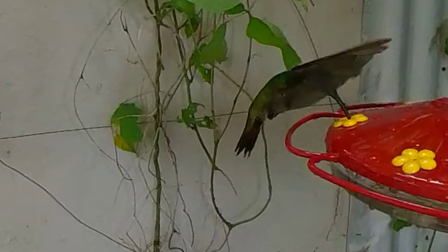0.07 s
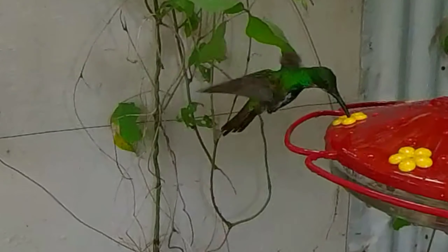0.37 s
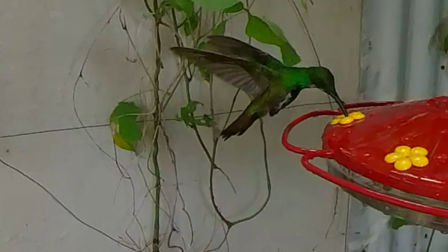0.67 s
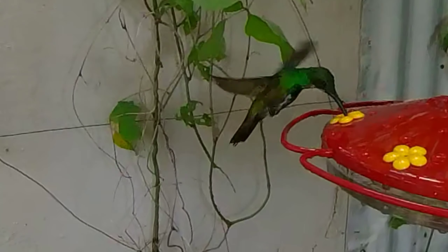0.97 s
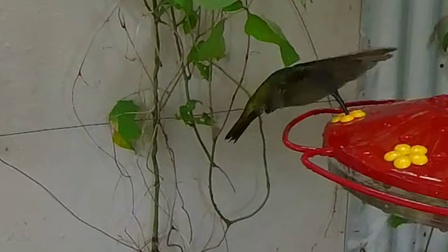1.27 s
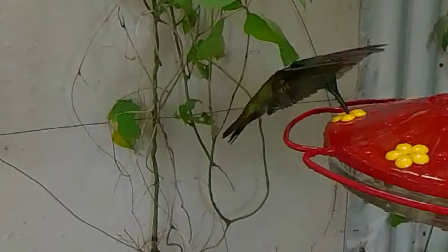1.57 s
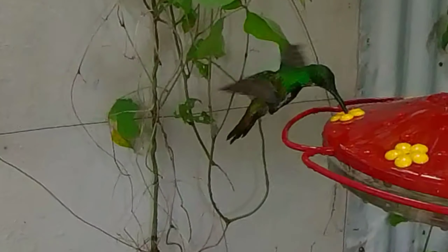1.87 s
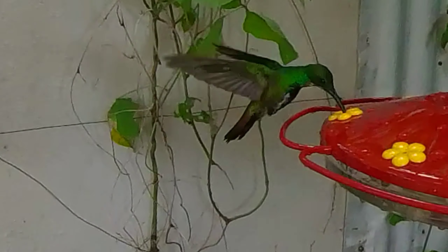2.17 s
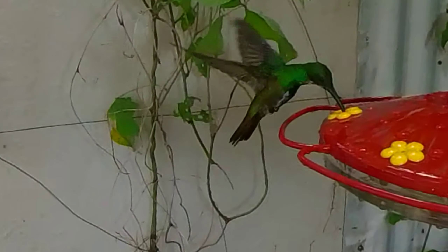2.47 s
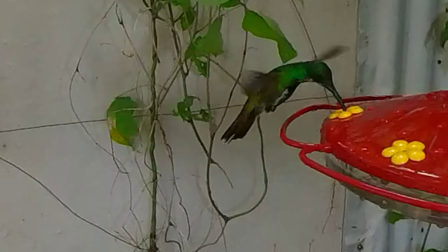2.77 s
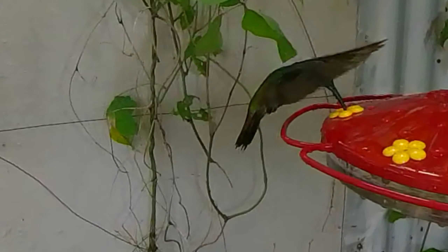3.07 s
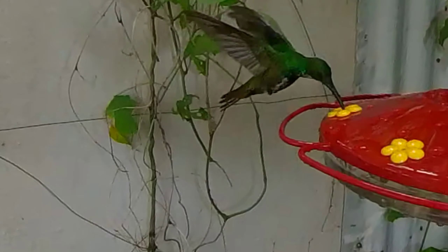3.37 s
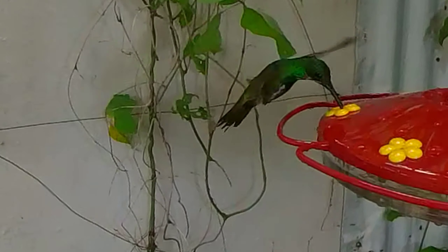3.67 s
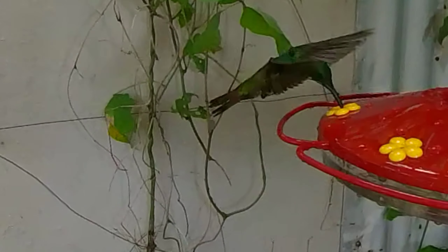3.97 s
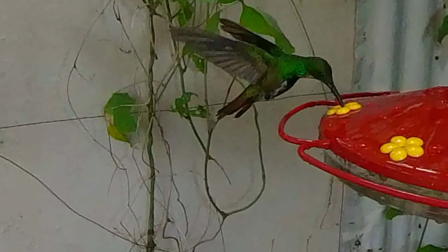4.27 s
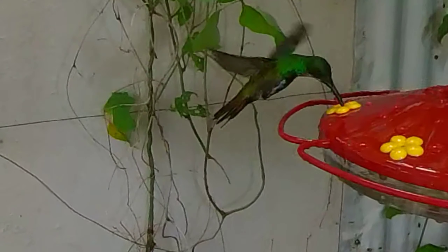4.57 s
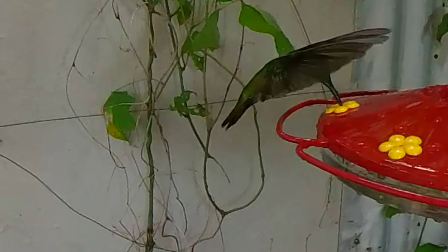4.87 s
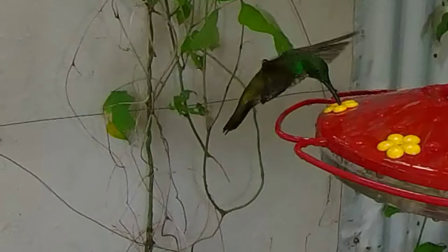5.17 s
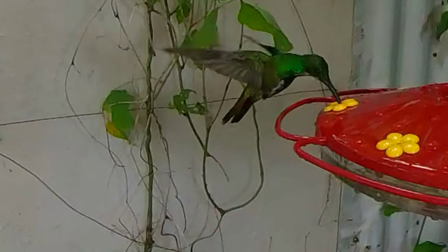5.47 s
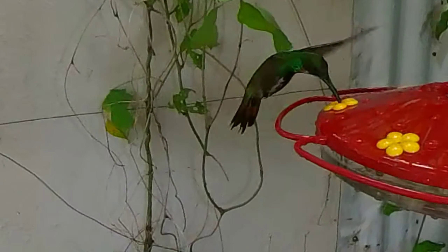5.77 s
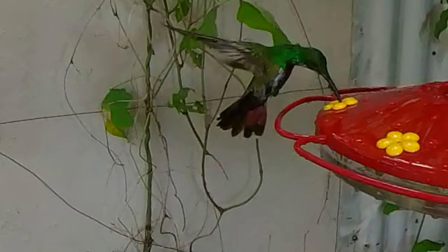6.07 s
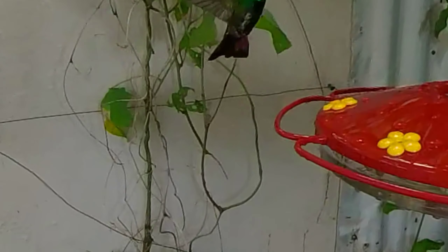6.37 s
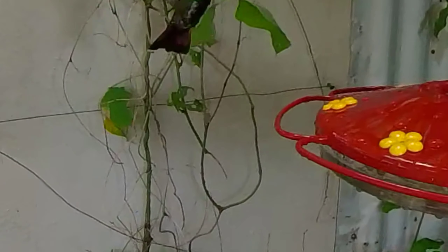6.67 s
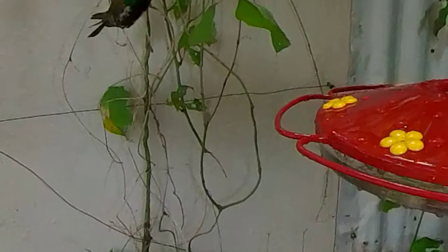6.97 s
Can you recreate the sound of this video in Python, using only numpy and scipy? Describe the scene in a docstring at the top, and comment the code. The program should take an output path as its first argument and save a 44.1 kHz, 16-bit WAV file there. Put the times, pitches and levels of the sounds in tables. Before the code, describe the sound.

A hummingbird's wings hum at a feeder over a low outdoor rumble, with scattered bird chips and then high, whistled chittering.

```python
"""A hummingbird hovers at a feeder by a house wall, its wing strokes humming over a low outdoor rumble,
a far engine, faint peeps and a thin hiss like that of compressed audio. Single V-shaped chips soon come
from farther off. From 4.4 s come two runs of high, whistled chittering, and a lower-voiced bird slurs
once in each; the walls throw the calls back. Near the end feathers snap twice as the bird flies up,
and the hum is loudest as it comes close."""
import sys
import numpy as np
from scipy import signal
from scipy.fft import rfft, irfft, next_fast_len
from scipy.io import wavfile
from scipy.ndimage import uniform_filter1d

SR = 44100
rng = np.random.default_rng(int(sys.argv[2]) if len(sys.argv) > 2 else 0)


def dump(signal):
    """Clip the signal to [-1, 1] and save it as 16-bit WAV at the path in sys.argv[1]."""
    limited = np.clip(np.atleast_2d(signal).T, -1, 1)
    pcm = np.round(limited * 32767).astype(np.int16)
    wavfile.write(sys.argv[1], SR, pcm)


N = 309141
TIME = np.arange(N) / SR

# Wingbeat. Each row: time in seconds, stroke rate in Hz.
STROKE_RATE = [(0.0, 48.4), (0.29, 55.9), (0.41, 52.24), (1.0, 55.45), (1.17, 45.7), (1.4, 46.76),
               (1.81, 52.63), (3.22, 54.77), (3.32, 52.28), (4.12, 50.24), (5.5, 55.6), (7.01, 50.6)]
# Hum partials. Each row: multiple of the stroke rate, relative level in dB.
WING_PARTIALS = [(.5, -19.5), (1, 1), (1.5, -19.5), (2, -14), (3, -26.5), (4, -30), (5, -27)]
# Hum envelope. Each row: time in seconds, relative level in dB.
WING_LEVEL = [(0.0, -38), (0.06, -44.5), (0.19, -72), (0.29, -54), (0.41, -51.5), (0.68, -43), (0.84, -55),
              (0.88, -50), (1.6, -51), (1.79, -68), (1.83, -47), (2.15, -41), (2.52, -63), (2.85, -48),
              (2.91, -51), (2.95, -52), (3.24, -39.5), (3.26, -53), (3.53, -46), (3.57, -37), (3.63, -60),
              (3.69, -40), (3.9, -49), (4.65, -42), (4.71, -38), (5.06, -48.5), (5.09, -66), (5.19, -41),
              (5.33, -41), (5.39, -57), (5.46, -38.5), (5.58, -54), (5.64, -41.5), (5.82, -60),
              (5.88, -37.5), (6.09, -50), (6.21, -35.5), (6.29, -46.5), (6.35, -34.5), (6.44, -51),
              (6.66, -35.5), (6.83, -40), (6.93, -29), (7.01, -38)]


def wings(gain_db=-2, flutter_db=2, flutter_hz=7, wander_hz=1.502):
    """Up- and downstroke each push the air once; their slight inequality gives half multiples."""
    stroke_hz = curve(STROKE_RATE) + wander_hz * drift(6, N)
    phase = 2 * np.pi * np.cumsum(stroke_hz) / SR
    hum = sum(from_db(db) * np.sin(k * phase + rng.uniform(0, 2 * np.pi)) for k, db in WING_PARTIALS)
    level_db = curve(WING_LEVEL) + flutter_db * np.minimum(drift(flutter_hz, N), 1)
    return np.sqrt(2) * from_db(level_db + gain_db) * hum


def whistle(shape, ratio=1, octave_db=-40, jitter=.012, uneven_db=2, edge_s=.0015):
    """One syrinx note: an unsteady gliding sine with its octave. Jitter is a fraction of the pitch."""
    s, hz, db = np.transpose(shape)
    t = np.arange(0, s[-1], 1 / SR)
    glide_hz = uniform_filter1d(np.interp(t, s, hz), size=88, mode="nearest")
    pitch_hz = glide_hz * ratio * (1 + jitter * drift(500, len(t)))
    phase = 2 * np.pi * np.cumsum(pitch_hz) / SR
    edges = np.sin(np.clip(np.minimum(t, t[-1] - t) / edge_s, 0, 1) * np.pi / 2) ** 2
    level = edges * from_db(np.interp(t, s, db) + uneven_db * drift(200, len(t)))
    return np.sqrt(2) * level * (np.sin(phase) + from_db(octave_db) * np.sin(2 * phase))


# Trill lead-in and U-shaped turn. Each row: offset in seconds, pitch in Hz, relative level in dB.
TRILL_LEAD = [(0, 8000, -16), (.007, 6850, -9.5), (.015, 6810, -5), (.021, 7050, -7), (.027, 7650, -2.5)]
TRILL_TURN = [(0, 8200, -3), (.004, 7060, -2), (.008, 6500, -1), (.013, 6450, -1), (.017, 7000, -3)]


def trill(ratio, lead_s, turn_s, count=3, sag_hz=55, fade_db=1.3):
    """A soft dipping lead-in, then quick turns of pitch, each lower and weaker than the last."""
    turns = [(lead_s + k * turn_s + s, hz - k * sag_hz, db - k * fade_db)
             for k in range(count) for s, hz, db in TRILL_TURN]
    return whistle(TRILL_LEAD + turns, ratio, jitter=.013, uneven_db=4)


# Note shapes. Each row: offset in seconds, pitch in Hz, relative level in dB.
PIP = [(0, 6840, -9), (.003, 6913, -1), (.010, 7060, 4), (0.016, 6950, -1), (0.021, 6140, -7)]
TICK = [(0, 6920, -23), (.002, 7550, 0), (.006, 7050, -3), (0.013, 6304, -3.5)]
SEEP = [(0, 8600, -6), (.006, 7150, 2), (.011, 6550, 5.5), (.019, 6170, 4), (.027, 5980, 6),
        (.035, 6080, -1), (.044, 6250, -11)]
UPSWEEP = [(0, 6100, -15.5), (.008, 6790, -5), (.012, 7450, -4), (.016, 8300, -4)]
SQUEAL = [(0, 8000, -6), (.013, 8000, -1), (0.016, 6920, -1.5), (.022, 5292, -5), (0.025, 4650, 2),
          (0.028, 6060, 0), (.033, 6400, 0), (.037, 5800, -3), (0.044, 7300, 3.5), (.046, 5840, 2),
          (.05, 4600, -1), (.056, 3480, -2), (.064, 2250, -7)]
# Notes around the trills. Each row: start in seconds, shape, level in dB, pitch ratio, jitter.
CHITTER_NOTES = [(4.845, PIP, -51, 1.01, 0.014), (5.021, UPSWEEP, -63, 1.05, .02),
                 (5.034, SEEP, -54.5, 1.0, 0.011), (5.713, SQUEAL, -56.5, 1.03, 0.077),
                 (6.118, TICK, -54.5, 1.007, .012), (6.296, UPSWEEP, -50.5, 1.04, .015),
                 (6.308, SEEP, -58, 1, .014)]
# Trills. Each row: start in seconds, level in dB, pitch ratio, lead-in and turn length in seconds.
TRILLS = [(4.406, -54.5, 1, 0.029, .021), (4.561, -56, 1.02, 0.033, 0.021),
          (4.707, -52.5, 1.017, 0.031, .0215), (5.823, -56, .995, .031, .0225),
          (5.971, -53.5, 1.017, 0.029, .023)]


def chitter():
    """Quick runs of trills, pips and falling seeps."""
    out = np.zeros(N)
    for start_s, db, ratio, lead_s, turn_s in TRILLS:
        add(out, start_s, from_db(db) * trill(ratio, lead_s, turn_s))
    for start_s, shape, db, ratio, jitter in CHITTER_NOTES:
        add(out, start_s, from_db(db) * whistle(shape, ratio, jitter=jitter))
    return out


# Slur shape. Each row: offset in seconds, pitch in Hz, relative level in dB.
SLUR_SHAPE = [(0, 4070, -14), (.008, 3930, -5), (.014, 3700, -2), (.027, 3480, -2), (.034, 3240, -8),
              (.046, 2950, -19), (.06, 2650, -31)]
# Slurs. Each row: start in seconds, level in dB, pitch ratio, length ratio, octave partial in dB.
SLURS = [(4.934, -41.5, 0.98, 0.99, -28), (6.209, -46, 0.99, 1.0, -10)]


def slurs(octave_follows=.25, jitter=.018):
    """Falling notes an octave below the chitter; their own octave stays more even as they swell and fade."""
    out = np.zeros(N)
    for start_s, db, ratio, stretch, octave_db in SLURS:
        note = [(s * stretch, hz, level_db) for s, hz, level_db in SLUR_SHAPE]
        octave = [(s, 2 * hz, octave_db + octave_follows * level_db) for s, hz, level_db in note]
        call = whistle(note, ratio, jitter=jitter) + whistle(octave, ratio, jitter=jitter)
        add(out, start_s, from_db(db) * call)
    return out


# Chips. Each row: start in seconds, first and top pitch in Hz, hold in seconds, lowest pitch in Hz,
# fall in seconds, last pitch in Hz, rise in seconds, level in dB, plunge in dB re that level,
# end in dB re the plunge, octave partial in dB.
CHIPS = [(0.736, 7000, 7150, 0.013, 2970, 0.016, 3620, 0.011, -72, -5.5, -1, 2),
         (1.061, 7470, 7290, 0.024, 4330, 0.02, 5780, 0.02, -81, 3.5, 4, -12),
         (1.299, 5600, 7170, 0.023, 2785, 0.013, 4860, 0.011, -67.5, -7, 3, -5),
         (2.006, 6570, 6100, 0.005, 2770, 0.016, 3970, 0.0069, -74, -5, -3, -2),
         (2.468, 7140, 7000, 0.0039, 3710, 0.01, 5150, 0.012, -75.5, 5.5, 6, -4),
         (2.748, 6400, 6440, 0.014, 2797, 0.011, 4000, 0.0093, -68.5, -6.5, 2, -1.5),
         (3.136, 7140, 7090, 0.012, 2730, 0.011, 3820, 0.013, -68.5, -8.5, 4, 0),
         (4.083, 8000, 8030, 0.01, 2160, 0.014, 3970, 0.015, -62, -9, -10, -3),
         (5.583, 5610, 6160, 0.0084, 2266, 0.01, 4230, 0.014, -80.5, 6, 9.5, -0.5)]


def chips(onset_db=-9, break_db=-8, bottom_db=-3):
    """Each chip holds high, plunges, breaks off briefly and turns up; a strong octave makes it harsh."""
    out = np.zeros(N)
    for (start_s, first_hz, top_hz, hold_s, low_hz, fall_s, last_hz, rise_s,
         db, plunge_db, end_db, octave_db) in CHIPS:
        turn_s = hold_s + fall_s
        shape = [(0, first_hz, onset_db),
                 (hold_s / 2, (first_hz + top_hz) / 2, 0),
                 (hold_s, top_hz, 0),
                 (hold_s + fall_s / 2, np.sqrt(top_hz * low_hz), plunge_db),
                 (turn_s - fall_s / 4, low_hz * (top_hz / low_hz) ** (1 / 4), plunge_db + break_db),
                 (turn_s, low_hz, plunge_db + bottom_db),
                 (turn_s + rise_s / 2, np.sqrt(last_hz * low_hz), plunge_db),
                 (turn_s + rise_s, last_hz, plunge_db + end_db)]
        add(out, start_s, from_db(db) * whistle(shape, octave_db=octave_db, jitter=.028, uneven_db=4))
    return out


# Resonances colouring the chips. Each row: centre in Hz, width in Hz, gain in dB.
SURFACE_RESONANCES = [(2620, 1000, 1), (3690, 490, 0.5), (4480, 130, 2), (5030, 160, -4), (5570, 190, 5.5),
                      (6640, 270, -3), (7610, 290, 5), (8300, 130, 0.5)]


def close_surfaces(x):
    """Close surfaces reinforce some pitches of a sweep, which ring on for an instant."""
    return sum(from_db(db) * signal.lfilter(*signal.iirpeak(hz, hz / width_hz, fs=SR), x)
               for hz, width_hz, db in SURFACE_RESONANCES)


# Feather snaps. Each row: start in seconds, relative level in dB.
SNAPS = [(6.353, -64.5), (6.394, -70)]


def feather_snaps(decay_s=.0071, band_hz=(1900, 6500)):
    """Feathers flick as the bird flies up: a few milliseconds of bright noise."""
    out = np.zeros(N)
    t = np.arange(SR // 20) / SR
    for start_s, db in SNAPS:
        add(out, start_s, from_db(db) * np.exp(-t / decay_s) * rng.standard_normal(len(t)))
    return 2 * signal.sosfilt(signal.butter(2, band_hz, "band", fs=SR, output="sos"), out)


# Peeps. Each row: start in seconds, pitch in Hz, length in seconds, level in dB, jitter.
PEEPS = [(0.058, 3740, 0.065, -86.5, .008), (0.2, 5960, 0.027, -88, .03), (0.449, 5430, 0.024, -77, 0.035),
         (1.419, 3340, 0.052, -84, .008), (3.978, 3220, 0.089, -88, 0.012), (4.48, 2780, 0.046, -86, .03),
         (4.717, 4457, 0.034, -81, 0.023), (4.913, 3680, 0.025, -84, 0.018),
         (4.976, 5450, 0.029, -81, .015), (5.274, 3750, 0.039, -79, 0.062),
         (5.283, 3220, 0.036, -79, 0.053), (5.868, 3580, 0.062, -81, .05), (5.912, 5470, 0.011, -71, 0.033),
         (6.01, 3700, 0.032, -77.5, 0.052), (6.388, 5680, 0.011, -70, .03), (6.61, 3500, 0.042, -85, 0.036),
         (6.77, 5420, 0.024, -84, .03), (6.93, 7550, 0.023, -81, .02)]


def peeps(droop=.04, ends_db=-5):
    """Short, thin notes of farther birds, sagging a little in pitch."""
    out = np.zeros(N)
    for start_s, hz, length_s, db, jitter in PEEPS:
        shape = [(0, hz * (1 + droop), ends_db), (length_s / 2, hz, 0), (length_s, hz * (1 - droop), ends_db)]
        add(out, start_s, from_db(db) * whistle(shape, jitter=jitter))
    return out


def distant_birds(floor_db=-106, range_db=8, centre_hz=3700, mean_s=.05, droop=.04, count=90):
    """A haze of short, nearly level calls from all over the neighbourhood."""
    out = np.zeros(N)
    for when, pitch, length, loudness in rng.random((count, 4)):
        hz = centre_hz * 2 ** (pitch - .5)
        length_s = mean_s * (.5 + length)
        shape = [(0, hz * (1 + droop), -10), (length_s / 2, hz, 0), (length_s, hz * (1 - droop), -8)]
        add(out, when * TIME[-1], from_db(floor_db + range_db * loudness) * whistle(shape, jitter=.019))
    return out


# Firing note. Each row: time in seconds, pitch in Hz.
ENGINE_PITCH = [(0, 72), (2.0, 88.7), (4.4, 92.46), (7.0, 103)]


def engine(level_db=-57.5, waver_db=3):
    """A far engine gathers speed: its low firing note creeps upward and wavers in level."""
    phase = 2 * np.pi * np.cumsum(curve(ENGINE_PITCH)) / SR
    return np.sqrt(2) * from_db(level_db + waver_db * drift(4, N)) * np.sin(phase)


# Rumble spectrum. Each row: frequency in Hz, relative density in dB.
RUMBLE_SPECTRUM = [(24, -10.5), (45, -2), (90, -7), (130, -6), (200, -10), (310, -13.5), (430, -16.5),
                   (620, -18), (950, -23), (1400, -31), (2000, -38.5), (2600, -49), (3400, -53)]
# Drone bands. Each row: centre in Hz, width in Hz, level in dB.
DRONE_BANDS = [(173.5, 10, -59.5), (261.4, 18, -63.5), (341, 8.8, -70), (582, 19, -70)]
# Bass contour. Each row: time in seconds, level in dB before scaling by swell_depth.
BASS_SWELL = [(0.0, -55), (0.06, -48), (2.44, -48.5), (2.56, -55), (2.62, -44), (2.66, -55.5), (2.69, -45),
              (2.93, -50.5), (2.99, -49.5), (3.03, -52), (3.67, -45.5), (3.77, -49.5), (4.41, -50.5),
              (4.78, -44.5), (4.92, -51), (4.94, -46.5), (5.48, -49.5), (5.78, -43.5), (6.03, -50.5),
              (6.07, -39.5), (6.13, -48.5), (6.89, -47.5), (6.93, -46), (7.01, -50)]


def outdoor_rumble(level_db=-46, swell_depth=.77, bass_hz=300):
    """Distant rumble with a faint wavering drone; the bass rises and sinks, the upper part stays even."""
    rumble = from_db(level_db) * noise(RUMBLE_SPECTRUM)
    for hz, width_hz, db in DRONE_BANDS:
        phase = 2 * np.pi * hz * TIME
        drone = drift(width_hz / 2, N) * np.sin(phase) + drift(width_hz / 2, N) * np.cos(phase)
        rumble += from_db(db) * unit_rms(drone)
    bass = signal.sosfiltfilt(signal.butter(2, bass_hz, fs=SR, output="sos"), rumble)
    contour_db = curve(BASS_SWELL)
    bass_gain = from_db(swell_depth * (contour_db - contour_db.mean()))
    return rumble + (bass_gain - 1) * bass


# Rush spectrum. Each row: frequency in Hz, relative density in dB.
RUSH_SPECTRUM = [(1400, -3), (2200, -3), (2800, -5)]
# Rush envelope. Each row: time in seconds, level in dB.
RUSH_LEVEL = [(4.2, -95), (4.9, -75.5), (5.5, -76.5), (6.3, -82)]


def rush():
    """A soft, distant rush that swells once and sinks away."""
    return from_db(curve(RUSH_LEVEL)) * noise(RUSH_SPECTRUM)


# Patchy hiss spectrum. Each row: frequency in Hz, relative density in dB.
PATCHY_HISS = [(1800, -9), (2700, -12.5), (3600, -2), (4600, -3), (6300, -3.5), (7200, -11), (7800, -13),
               (9500, -4)]


def patchy_hiss(level_db=-83, flicker_db=2.6, flicker_hz=7, bands=36):
    """Thin hiss with a patchy, band-by-band flicker like that of compressed audio."""
    size = next_fast_len(N)
    spectrum = rfft(noise(PATCHY_HISS), size)
    band = np.searchsorted(np.geomspace(2200, 8000, bands - 1), np.fft.rfftfreq(size, 1 / SR))
    hiss = sum(irfft(spectrum * (band == k), size) * from_db(flicker_db * drift(flicker_hz, size))
               for k in range(bands))
    return from_db(level_db) * unit_rms(hiss[:N])


# Wide hiss spectrum. Each row: frequency in Hz, relative density in dB.
WIDE_HISS = [(3000, -4), (4500, 3), (5800, -3.5), (6400, -4.5)]


def wide_hiss(level_db=-88.5):
    """Steady, wide stereo hiss at 3-6 kHz, like audio-coder noise."""
    return from_db(level_db) * noise(WIDE_HISS) * np.array([[1], [-1]])


def from_db(db):
    """Decibels to gain."""
    return 10 ** (np.asarray(db) / 20)


def unit_rms(x):
    """Scale to rms 1."""
    return x / np.sqrt(np.mean(x ** 2) + 1e-20)


def curve(points):
    """Interpolate (seconds, value) rows over the scene."""
    return np.interp(TIME, *np.transpose(points))


def add(out, start_s, sound):
    """Mix a sound in at a given time."""
    at = int(start_s * SR)
    out[at:at + len(sound)] += sound[:N - at]


def noise(spectrum):
    """Noise with a given spectrum and steep skirts; rms 1."""
    hz, db = np.transpose(spectrum)
    size = next_fast_len(N)
    f = np.maximum(np.fft.rfftfreq(size, 1 / SR), 1)
    skirts = 1 / (1 + (hz[0] / f) ** 8) / (1 + (f / hz[-1]) ** 12)
    gain = from_db(np.interp(np.log(f), np.log(hz), db)) * skirts
    return unit_rms(irfft(gain * rfft(rng.standard_normal(size)))[:N])


def drift(rate_hz, size):
    """Smooth random wander with a spread near 1."""
    steps = np.arange(size) / SR * 2 * rate_hz
    return np.interp(steps, np.arange(N // 10), rng.standard_normal(N // 10))


def yard(x, echoes, tail_db, t60_s, build_s, side_db):
    """Direct sound, wall echoes and a diffuse tail that is a little different in each ear."""
    t = np.arange(SR // 2) / SR
    fade = from_db(-60 * t / t60_s) * (1 - np.exp(-t / build_s))
    mid, side = rng.standard_normal((2, len(t))) * fade / np.sqrt(np.sum(fade ** 2)) * from_db(tail_db)
    mid[0] += 1
    for delay_s, db in echoes:
        mid[int(delay_s * SR)] += from_db(db)
    return np.array([signal.fftconvolve(x, mid + sign * from_db(side_db) * side)[:N] for sign in (1, -1)])


# Wall echoes for near, lower-voiced and far callers. Each row: delay in seconds, gain in dB.
NEAR_ECHOES = [(.0021, -14), (.0047, -7), (.0078, -10), (0.021, -15), (.056, -19)]
SLUR_ECHOES = [(.0115, -17), (.043, -25)]
FAR_ECHOES = [(.0033, -7), (.0095, -10), (0.0184, -11)]


def scene():
    """Near and far callers in the yard, with the wings and the rumble in the centre."""
    near = yard(chitter(), NEAR_ECHOES, tail_db=-2, t60_s=.22, build_s=.003, side_db=-48)
    lower = yard(slurs(), SLUR_ECHOES, tail_db=-6, t60_s=.22, build_s=.0063, side_db=-52)
    chips_and_snaps = close_surfaces(chips()) + feather_snaps()
    far = yard(chips_and_snaps, FAR_ECHOES, tail_db=2, t60_s=.17, build_s=.005, side_db=-22.5)
    farther = yard(peeps(), [], tail_db=3.5, t60_s=.16, build_s=.0065, side_db=-18)
    haze = yard(distant_birds(), [], tail_db=9, t60_s=.35, build_s=.016, side_db=-17.5)
    birds = from_db(1) * near + from_db(-3.5) * lower + from_db(4.5) * far + from_db(-1) * farther + haze
    return wings() + birds + engine() + outdoor_rumble() + rush() + patchy_hiss() + wide_hiss()


def record(dry, sampling_hz=16000, treble_hz=8400, smoothing_hz=7950, cutoff_hz=9555, hiss_db=-94):
    """A low sampling rate mirrors the treble about 8 kHz; filters leave some image; the circuit hisses."""
    soft = signal.sosfilt(signal.butter(8, treble_hz, fs=SR, output="sos"), dry)
    mirrored = soft * (1 + 2 * np.sin(2 * np.pi * sampling_hz * TIME))
    smooth = signal.sosfilt(signal.butter(18, smoothing_hz, fs=SR, output="sos"), mirrored)
    circuit_hiss = from_db(hiss_db) * noise([(2000, -2.6), (8400, 0), (9500, -.84)])
    return signal.sosfilt(signal.ellip(10, .2, 70, cutoff_hz, fs=SR, output="sos"), smooth + circuit_hiss)


dry = scene()
out = record(dry)
dump(out)
```